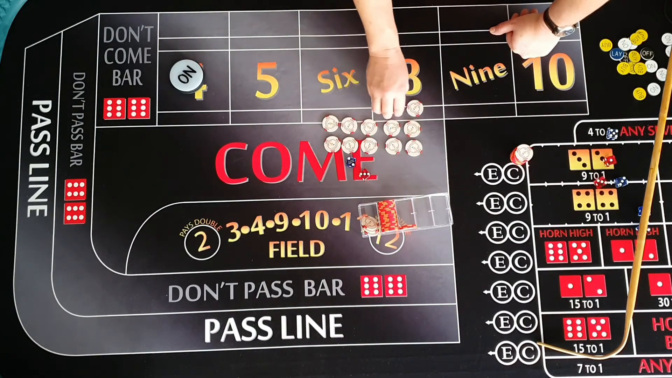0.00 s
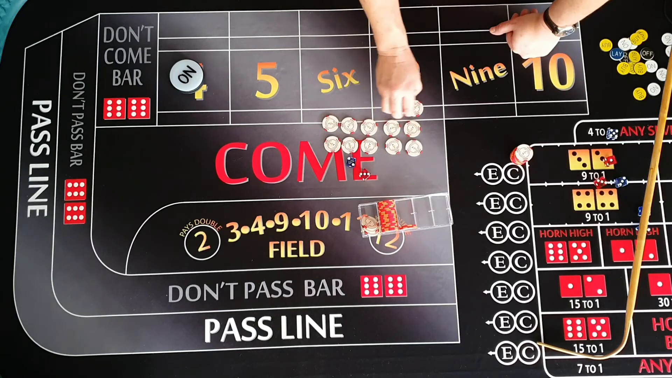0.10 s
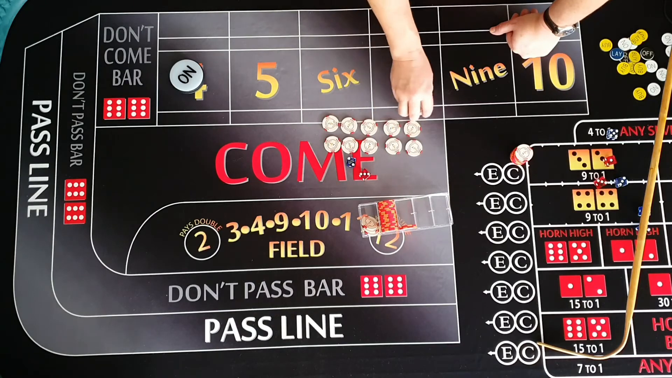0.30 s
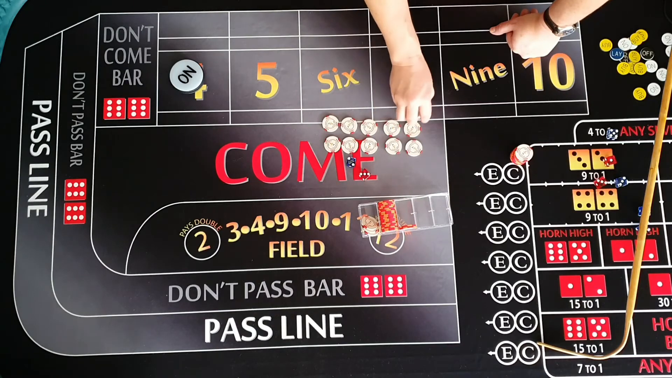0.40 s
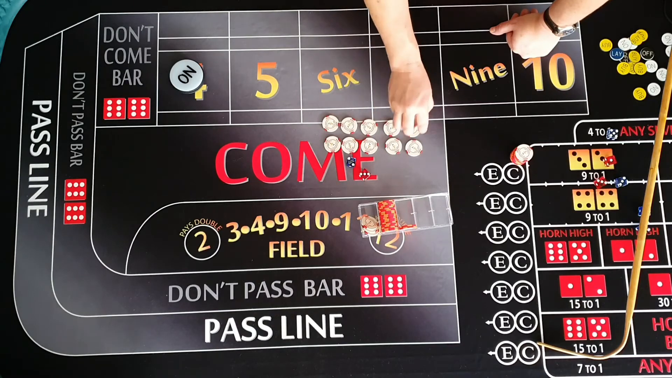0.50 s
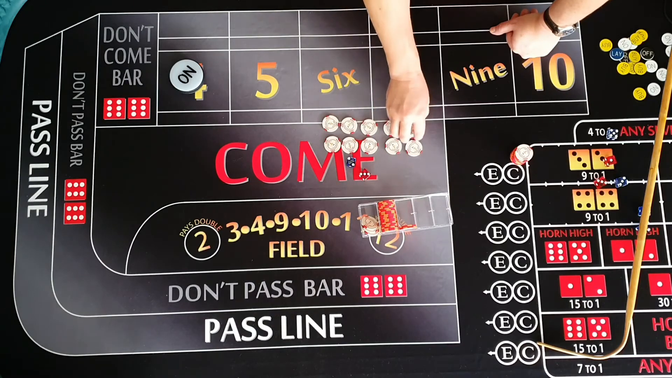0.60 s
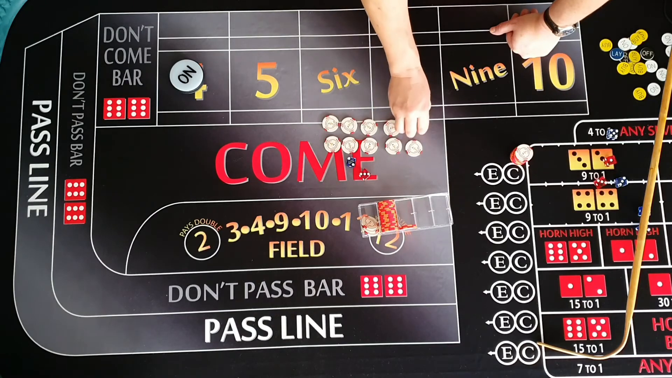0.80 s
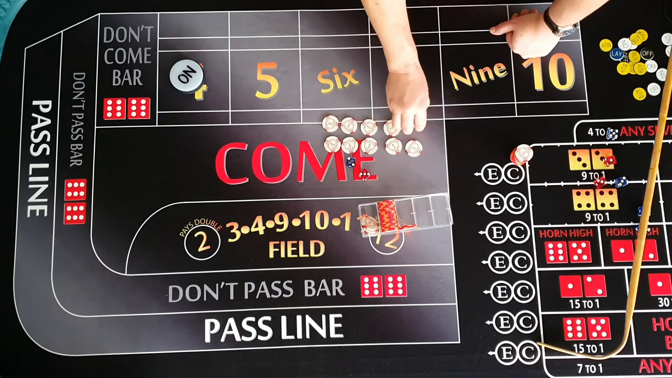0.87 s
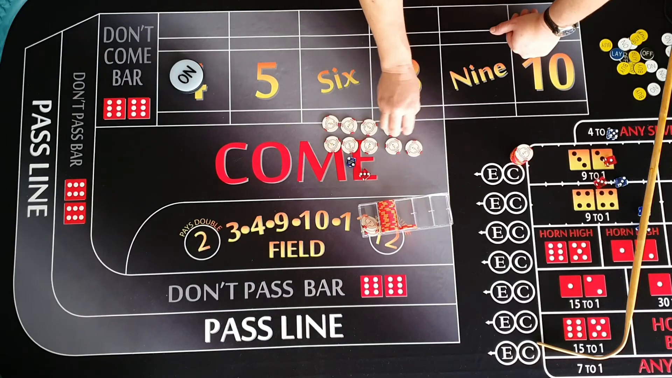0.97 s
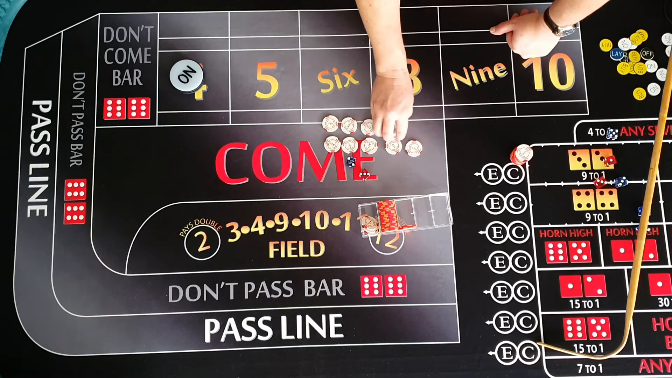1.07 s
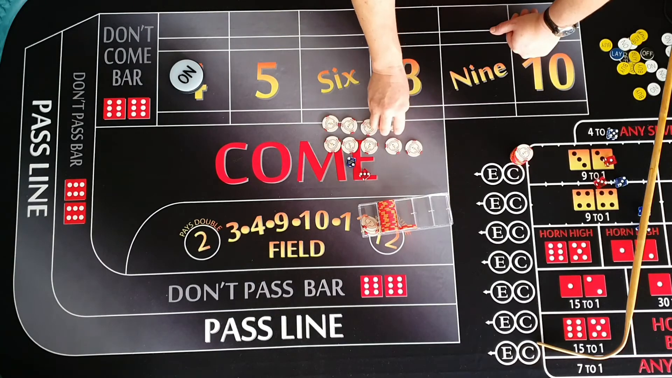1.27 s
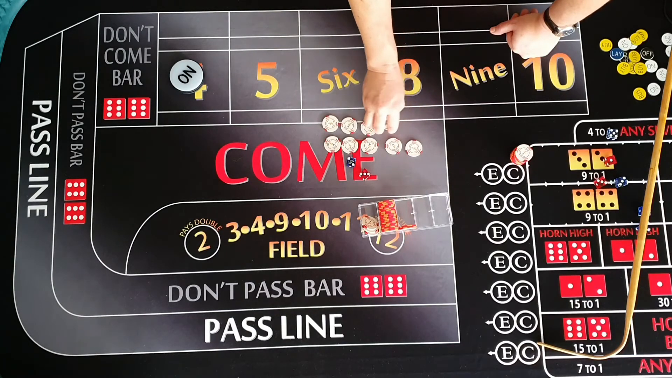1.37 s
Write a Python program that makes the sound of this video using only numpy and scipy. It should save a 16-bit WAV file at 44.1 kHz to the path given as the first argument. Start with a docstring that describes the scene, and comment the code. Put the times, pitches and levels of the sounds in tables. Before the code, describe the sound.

Plastic casino chips click down one after another on a felt-covered table in a live room

```python
"""A drop of plastic casino chips is already dying away; three more follow at about 0.2, 0.6 and 1.06 s.
In each, chip edges touch and ring near 6.5 kHz (decaying sines), with a snap of noise and a stack clack.
The chips also meet the felt-covered table, heard as a slap and a knock of noise and low, thudding sines.
A live room rings on for about half a second after each hit, made from fading noise.
Faint ventilation, a steady coloured noise, runs throughout; the sound is mono."""
import sys
import numpy as np
from scipy import signal
from scipy.fft import rfft, irfft
from scipy.io import wavfile

SR = 44100
rng = np.random.default_rng(int(sys.argv[2]) if len(sys.argv) > 2 else 0)


def to_wav(s):
    """Save 16-bit WAV."""
    ch = np.atleast_2d(s).T  # columns
    pcm = np.round(np.clip(ch, -1, 1) * 32767)  # PCM
    wavfile.write(sys.argv[1], SR, pcm.astype(np.int16))


N = 61740

# Chip touching chip; glancing contacts have a duller snap. Columns: [t/s, ring pitch f/Hz, ring level/dB,
# snap level/dB, snap upper edge f/Hz, clack pitch f/Hz, clack level/dB]
CONTACTS = [(-0.105, 6630, -4.5, -4.5, 12100, 4530, -5.5), (0.2006, 6613, -2, -15.5, 11500, 4400, -17.5),
            (0.2034, 6510, -5, -16, 11500, 4550, -39), (0.2091, 6760, -8, -6.5, 12600, 4900, -33),
            (0.2149, 7120, -12.5, -8.5, 18000, 4610, -7.5), (0.2168, 6100, -26, -9, 18000, 3605, -10),
            (0.2238, 6700, -10, -15, 18000, 4740, -6.5), (0.227, 6350, -9.5, -34, 16000, 3600, -15.5),
            (0.2330, 6720, -16.5, -14, 14000, 3503, -11), (0.587, 6520, -5, -11.5, 18000, 5570, -10.5),
            (0.5965, 6656, -6, -12.5, 16000, 4490, -7), (0.6045, 6930, -10, -15.5, 18500, 4140, -11),
            (0.6075, 6454, -11.5, -13, 16000, 4520, -26), (0.6096, 6080, -11.5, -31, 13400, 3280, -16),
            (1.0592, 6940, -4.5, -17.5, 12500, 4930, -19.5), (1.0611, 6980, -8, -19, 12500, 4910, -21),
            (1.0663, 6495, -8.5, -10.5, 13000, 5040, -11), (1.0692, 6940, -19, -19, 15200, 4710, -12),
            (1.075, 6380, -28, -24, 18000, 4950, -22)]
# The stack meeting the table: [t/s, thud level/dB, knock level/dB, slap level/dB]
LANDINGS = [(-0.095, -20, -16.5, -10.5), (0.2144, -32.5, -16.5, -25), (0.2239, -18, -14.5, -14.5),
            (0.5878, -27, -22, -33), (0.6015, -15.5, -11.5, -19.5), (1.0663, -22.5, -22.5, -22),
            (1.0745, -15.5, -23, -25)]
# Ways one chip bends as it rings: [multiple of the ring pitch, level/dB, t60/s]
CHIP_MODES = [(.915, -7, 0.033), (.95, -15.5, 0.066), (1., -2.5, 0.034), (1.035, -11, 0.044),
              (1.39, -19.5, 0.041), (1.70, -17, 0.019), (1.79, -44, 0.013), (2.25, -13, .018)]
# Ringing of chips pressed together in the stack: [multiple of the clack pitch, level/dB, t60/s]
STACK_MODES = [(0.472, -15.5, 0.017), (0.772, -17.5, 0.026), (0.948, -5.5, 0.0077), (1.002, -3.5, 0.018),
               (1.121, -6, 0.023), (1.261, -6, 0.023)]
# Low ringing of the padded board: [f/Hz, level/dB, t60/s]
TABLE_MODES = [(134.2, -8.5, 0.075), (201.4, -3.5, 0.054), (254.8, -4, 0.058), (315, -6, 0.077),
               (449.6, -6, 0.039), (514, -7, 0.05), (651, -10.5, .06), (777, -7, 0.03)]
# Tone colour of the chips' snap: [f/Hz, relative level/dB per Hz]
SNAP_COLOUR = [(100, -19), (500, -2), (2500, -9), (5000, -11.5), (7000, 4.5), (7900, -6.5), (9400, 2.5),
               (12000, 4), (13700, -6), (15000, 5), (16000, -25)]
# Tone colour of the slap on the felt: [f/Hz, relative level/dB per Hz]
SLAP_COLOUR = [(400, -10.5), (1000, -3.5), (1650, 1), (2300, -8), (2900, 1), (4000, -17.5), (9000, -9)]
# Tone colour of the knock on the board: [f/Hz, relative level/dB per Hz]
KNOCK_COLOUR = [(100, -14.5), (300, -7.5), (520, 1), (780, 1.5), (1100, -3), (1500, -14), (2300, -13.5),
                (4000, -7), (12000, -23)]
# How the room rings on in each pitch range: [centre f/Hz, t60/s, tail level/dB]
ROOM = [(96, 0.52, -7), (280, 0.48, -5), (850, 0.5, -1.5), (1870, 0.58, -2.5), (4480, .6, -5),
        (6470, 0.59, -5), (9900, 0.49, -7.5), (15100, 0.38, -10)]
# Tone colour of the ventilation: [f/Hz, relative level/dB per Hz]
AIR_COLOUR = [(20, -33), (35, -26), (55, 0.5), (80, -13.5), (130, -15.5), (190, -14), (240, -7.5),
              (350, -4), (450, -8.5), (950, -4), (1900, -15), (2600, -16.5), (5000, -18), (15000, -30)]

# t60 is the time a sound takes to fade by 60 dB
SNAP_T60_S, SLAP_T60_S, KNOCK_T60_S = 0.015, 0.036, 0.041
CONTACT_RISE_S, TABLE_RISE_S = 0.00041, 0.0026  # how gradually a hit starts
CHIP_LOW_HZ = 353  # chips are too small to radiate bass
TABLE_LOW_HZ = 113  # the board radiates little below this
ROOM_BUILD_S = 0.0048  # how gradually the room's tail swells
EARLY_DB, EARLY_T60_S, EARLY_START_S = -7.5, 0.21, 0.0014  # scatter off the table, rails and nearby surfaces
AIR_DB = -50.5
LEAD_S = 0.2  # extra time worked out before t = 0, so the first drop can already be fading
TOP_HZ = 15800  # highest pitch the microphone passes


def chips():
    """Each contact snaps, rings the loose chip and clacks the stack under it; gives (time, sound) pairs."""
    t = np.arange(SR // 10) / SR
    remove_bass = signal.butter(2, CHIP_LOW_HZ, "high", fs=SR, output="sos")
    for at, ring_hz, ring_db, snap_db, edge_hz, clack_hz, clack_db in CONTACTS:
        chip_modes = [(ring_hz * multiple, db, t60) for multiple, db, t60 in CHIP_MODES]
        stack_modes = [(clack_hz * multiple, db, t60) for multiple, db, t60 in STACK_MODES]
        chip = undb(ring_db) * ring(t, chip_modes, CONTACT_RISE_S)
        stack = undb(clack_db) * ring(t, stack_modes, CONTACT_RISE_S)
        soften = signal.butter(2, edge_hz, fs=SR, output="sos")
        snap = signal.sosfilt(soften, burst(t, SNAP_COLOUR, SNAP_T60_S, CONTACT_RISE_S))
        yield at, signal.sosfilt(remove_bass, chip + stack + undb(snap_db) * snap)


def table():
    """Each landing slaps the felt, knocks the board and makes it thud; gives (time, sound) pairs."""
    t = np.arange(SR // 4) / SR
    remove_bass = signal.butter(4, TABLE_LOW_HZ, "high", fs=SR, output="sos")
    for at, thud_db, knock_db, slap_db in LANDINGS:
        thud = undb(thud_db) * ring(t, TABLE_MODES, TABLE_RISE_S)
        knock = undb(knock_db) * burst(t, KNOCK_COLOUR, KNOCK_T60_S, TABLE_RISE_S)
        slap = undb(slap_db) * burst(t, SLAP_COLOUR, SLAP_T60_S, CONTACT_RISE_S)
        yield at, signal.sosfilt(remove_bass, thud + knock + slap)


def room(hits):
    """Direct sound, near scatter fading over about 0.2 s and a diffuse tail; each hit takes its own paths."""
    t = np.arange(SR) / SR
    hz = np.fft.rfftfreq(SR, 1 / SR)
    centres = [centre for centre, _, _ in ROOM]
    white = np.exp(2j * np.pi * rng.random(len(hz))) * np.sqrt(SR)
    # Split the noise into overlapping pitch ranges, one per row of ROOM
    bands = np.array([irfft(white * along(hz, centres, share), SR) for share in np.eye(len(ROOM))])

    early = fade(t, EARLY_T60_S) * (t > EARLY_START_S)
    early = undb(EARLY_DB) * early / np.linalg.norm(early)
    shapes = []
    for _, t60, tail_db in ROOM:
        tail = fade(t, t60) * (1 - np.exp(-(t / ROOM_BUILD_S) ** 2))
        tail = undb(tail_db) * tail / np.linalg.norm(tail)
        shapes.append(np.hypot(early, tail))  # adds their energies
    shapes = np.array(shapes)

    track = np.zeros(N + int(LEAD_S * SR))
    for at, sound in hits:
        # Start the noise at a random place, giving this hit its own paths
        own_bands = np.roll(bands, rng.integers(SR), axis=1)
        response = np.sum(shapes * own_bands, axis=0)
        add(track, at, sound)
        add(track, at, signal.fftconvolve(sound, response))
    return track[-N:]


def ventilation():
    """Faint, steady rush of air: noise with a fixed tone colour."""
    return undb(AIR_DB) * noise(AIR_COLOUR, N)


def ring(t, modes, rise):
    """Decaying sines (f/Hz, level/dB, t60/s) set off by one contact."""
    total = np.zeros(len(t))
    for hz, db, t60 in modes:
        sine = np.sin(2 * np.pi * (hz * t + rng.random()))  # random starting phase
        total += undb(db) * fade(t, t60) * sine
    return total * (1 - np.exp(-t / rise))


def burst(t, colour, t60, rise):
    """A short rush of dense vibration with a smooth spectrum and, for given settings, the same energy."""
    shape = fade(t, t60) * (1 - np.exp(-t / rise))
    size = 2 * len(t)
    gain = colour_gain(colour, size)
    # Keep only the phases of fading noise, so the spectrum itself has no random bumps
    phase = np.angle(rfft(rng.standard_normal(len(t)) * shape, size))
    x = irfft(gain * np.exp(1j * phase), size)[:len(t)]
    x = x * np.sqrt(shape)
    return x * np.sqrt(np.sum(shape ** 2) / np.sum(x ** 2))


def noise(colour, size):
    """Steady noise of the given colour, made of random phases and scaled to an rms of 1."""
    gain = colour_gain(colour, size)
    x = irfft(gain * np.exp(2j * np.pi * rng.random(len(gain))), size)
    return x / x.std()


def colour_gain(colour, size):
    """Turn a colour table into a gain for every frequency of a sound with this many samples."""
    points, levels = np.array(colour, float).T
    return undb(along(np.fft.rfftfreq(size, 1 / SR), points, levels))


def along(hz, points, values):
    """Join points by straight lines on a log-frequency axis."""
    return np.interp(np.log(np.maximum(hz, 1)), np.log(points), values)


def fade(t, t60):
    """Exponential decay, 60 dB down after t60."""
    return np.exp(-np.log(1000) * t / t60)


def undb(db):
    """Decibels to gain."""
    return 10 ** (np.asarray(db) / 20)


def add(track, at, sound):
    """Mix a sound into the track at a given time."""
    i = max(int((at + LEAD_S) * SR), 0)
    track[i:i + len(sound)] += sound[:len(track) - i]


def scene():
    """Chips and table in the room, over the ventilation; the same in both channels."""
    hits = [*chips(), *table()]
    mono = room(hits) + ventilation()
    return np.array([mono, mono])


def record(dry):
    """The microphone rounds the highest peaks and cuts the top."""
    rounded = np.tanh(dry)
    cut_top = signal.ellip(10, 0.2, 80, TOP_HZ, fs=SR, output="sos")  # 0.2 dB ripple, 80 dB cut
    return signal.sosfilt(cut_top, rounded)


dry = scene()
out = record(dry)
to_wav(out)
```